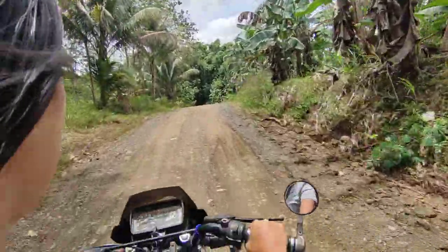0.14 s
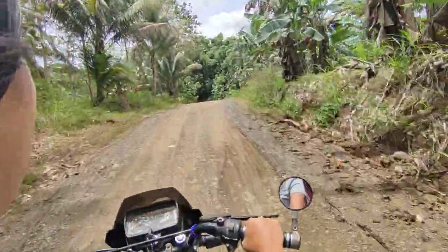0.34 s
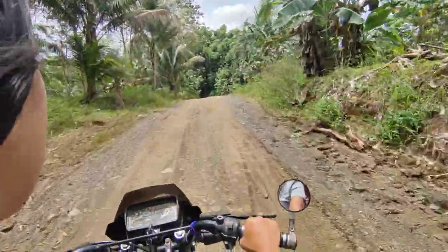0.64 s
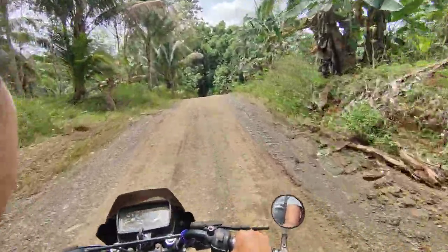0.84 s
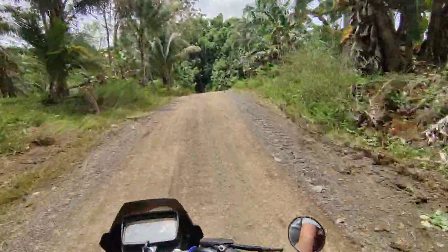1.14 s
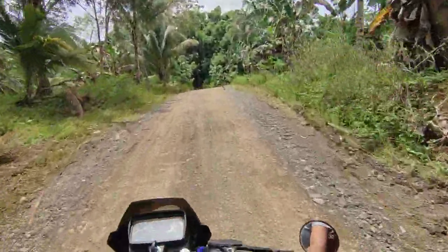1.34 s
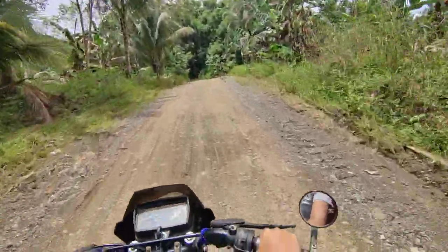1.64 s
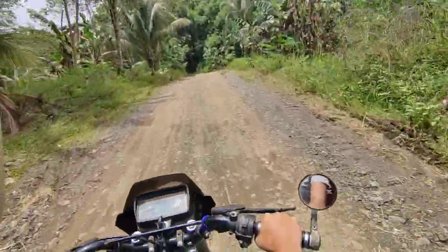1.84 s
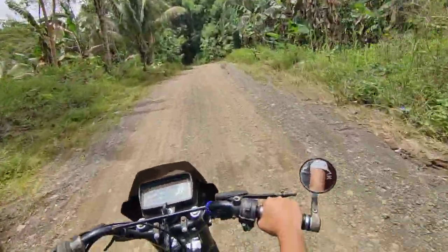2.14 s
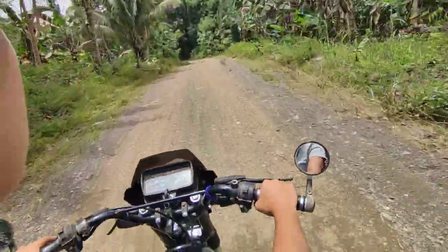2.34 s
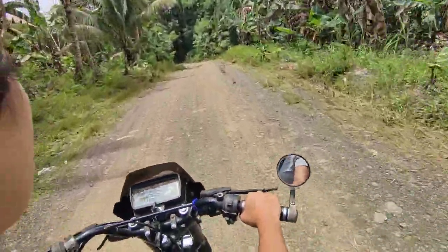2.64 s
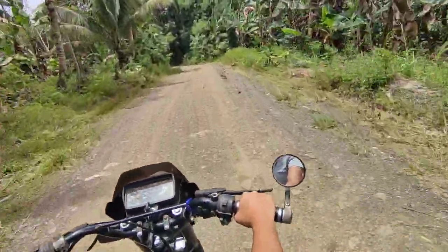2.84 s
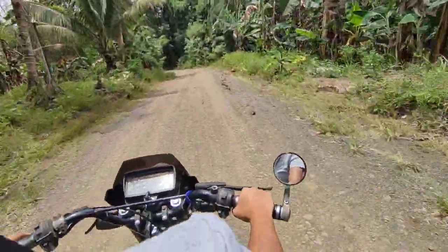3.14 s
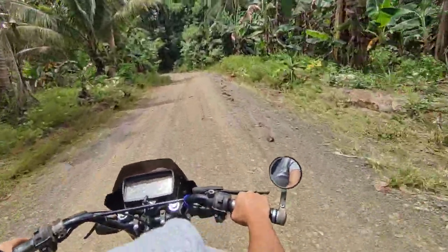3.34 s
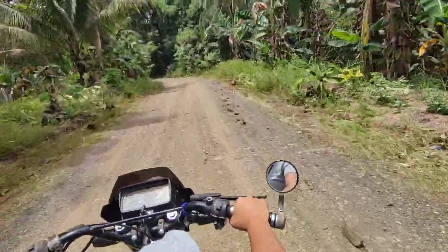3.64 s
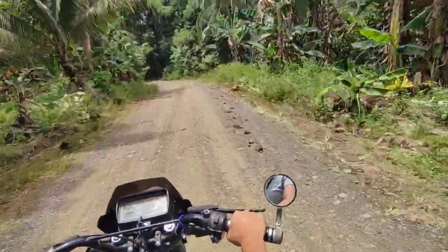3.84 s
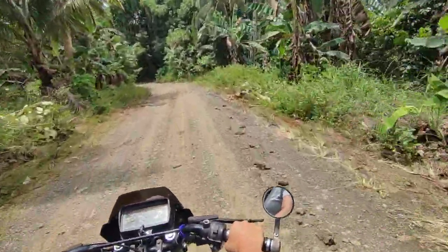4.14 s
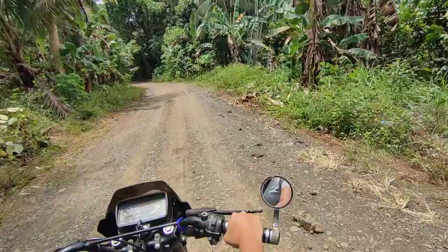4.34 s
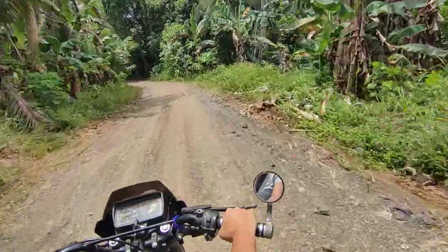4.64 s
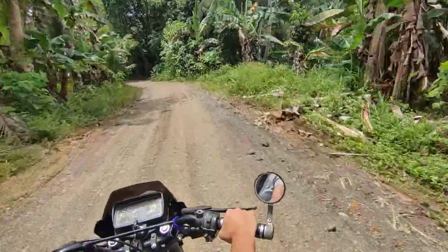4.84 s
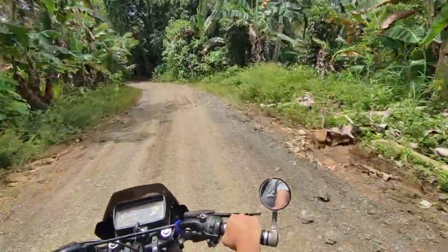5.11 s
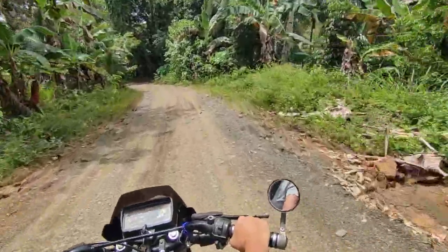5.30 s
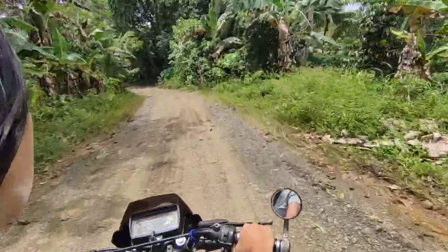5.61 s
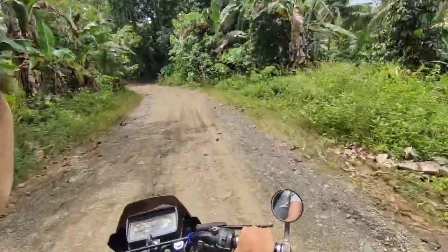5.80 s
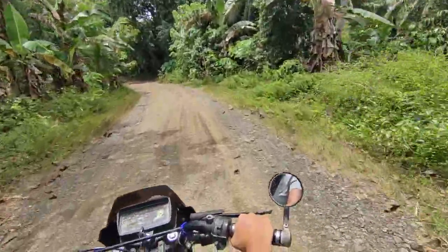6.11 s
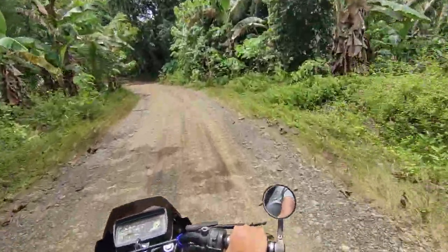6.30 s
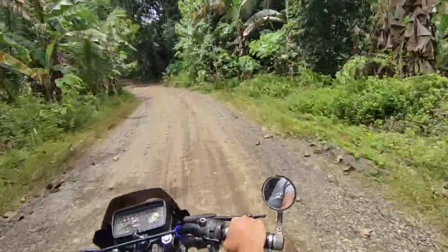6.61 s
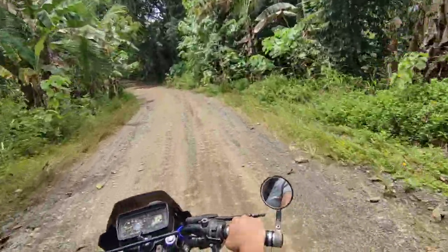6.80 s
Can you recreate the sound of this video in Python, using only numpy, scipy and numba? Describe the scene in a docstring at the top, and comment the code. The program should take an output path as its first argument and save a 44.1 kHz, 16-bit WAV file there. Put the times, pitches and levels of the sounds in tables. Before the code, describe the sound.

Heard from just behind the handlebar, a small single-cylinder motorcycle is already riding on gravel. Its exhaust thuds rapidly over metallic rattle, gear whine and tyre hiss. Wind buffets the right side hard after one second, then snaps at the left. The engine runs lighter through the middle, two tiny stones tick around four seconds, and it finally pulls harder amid new gusts.

```python
"""A small single-cylinder motorcycle rides along a gravel road, heard at two ports behind the handlebar.
From the start each firing rings silencer, air box and cases, gears whine and gravel hisses; the engine
pulls, then runs light from 0.2 s. Wind rumbles on each port by itself; pressure lumps and eddy rasp buffet
the right port most at 1.1-2.1 s, the left at 2.3-2.6 s. Two stones tick near 4 s as decaying noise; from
5.7 s the engine pulls hard again amid gusts. Each port's limiter ducks everything on that side."""
import sys
import numpy as np
from scipy import signal
from scipy.fft import rfft, irfft
from scipy.io import wavfile
from scipy.ndimage import uniform_filter1d
from numba import njit

SR = 44100
rng = np.random.default_rng(int(sys.argv[2]) if len(sys.argv) > 2 else 0)


def generate_wav(sig):
    """Save sig (samples, or channels by samples) to the path in sys.argv[1] as 16-bit PCM at SR."""
    pcm = np.round(np.clip(np.atleast_2d(sig).T, -1, 1) * 32767).astype(np.int16)
    wavfile.write(sys.argv[1], SR, pcm)


N = 306930


def undb(db):
    """Decibels to amplitude."""
    return 10 ** (np.asarray(db) / 20)


def unit(x):
    """Scale to an RMS of 1."""
    return x / np.sqrt(np.mean(x ** 2))


def curves(table):
    """Columns of a table joined by straight lines in time."""
    s, *columns = np.transpose(table)
    return [np.interp(np.arange(N) / SR, s, c) for c in columns]


@njit
def svf(x, hz, width_hz):
    """State-variable filter with a moving centre: band-pass and low-pass."""
    band_out, low_out = np.empty(len(x)), np.empty(len(x))
    b, l = 0., 0.  # the two integrator states
    for i in range(len(x)):
        g, k = np.pi * hz[i] / SR, width_hz / hz[i]
        v = (b + g * (x[i] - l)) / (1 + g * (g + k))
        band_out[i], low_out[i] = k * v, l + g * v
        b, l = 2 * v - b, l + 2 * g * v
    return band_out, low_out


def warp(hz):
    """The setting at which the filter really rings at hz."""
    return np.tan(np.pi * hz / SR) * SR / np.pi + np.zeros(N)


def band(x, hz, width_hz):
    """Band-pass resonance with its pitch and width corrected for the sample rate."""
    return svf(x, warp(hz), width_hz / np.cos(np.pi * np.mean(hz) / SR) ** 2)[0]


def steep(x, hz, width_hz):
    """Two band-passes in a row, the second narrower, for steeper skirts."""
    return band(band(x, hz, width_hz), hz, 0.59 * width_hz)


def low(x, hz):
    """Second-order low-pass."""
    return svf(x, hz + np.zeros(N), np.sqrt(2) * hz)[1]


@njit
def follow(x, release):
    """Peak follower: jumps up at once, sinks slowly."""
    out, e = np.empty(len(x)), 0.
    for i in range(len(x)):
        e = max(x[i], e * release)
        out[i] = e
    return out


def noise():
    """White noise as long as the scene."""
    return rng.standard_normal(N)


def walk(rate):
    """Random levels held 1 / rate s and slewed twice; scaled to an RMS of 1."""
    k = int(SR / rate)
    steps = np.repeat(rng.standard_normal(N // k + 1), k)
    return unit(uniform_filter1d(uniform_filter1d(steps, k), k)[:N])


def sides(pan_db):
    """Left and right gains that differ by pan_db."""
    return undb(np.array([[pan_db], [-pan_db]]) / 2)


def firing(hz, first_turn=.69, jitter=0.0068, scatter_db=1.85):
    """One pulse per cycle, each a little early or late and of its own strength; also phase and cycle number."""
    turns = first_turn + np.cumsum(hz) / SR + jitter * walk(25)
    cycle = np.maximum.accumulate(np.floor(turns)).astype(int)
    strength = undb(scatter_db * rng.standard_normal(cycle[-1] + 1))[cycle]
    return np.diff(cycle, prepend=cycle[0]) * strength, turns % 1, cycle


def boom(pulses, hz, boom_db, load):
    """The silencer passes the low firing orders as a clean boom; under load it sinks to the lower ones."""
    # third to sixth order with a light and a pulling engine: (level [dB])
    light_orders = [-39, -31.5, -22.5, -29]
    pulling_orders = [-15, -9.5, -17.5, -36.5]
    out, ring = 0, band(pulses, hz=152.5, width_hz=32)
    for order, (light_db, pulling_db) in enumerate(zip(light_orders, pulling_orders), start=3):
        line = steep(ring, order * hz, width_hz=24.7)
        steady_line = line / np.sqrt(uniform_filter1d(line ** 2, size=8000) + 1e-12)
        out = out + undb(boom_db + light_db + load * (pulling_db - light_db)) * steady_line
    return out


def honk(pulses, bite_db):
    """The air box gulps after each firing and once more as the wave returns, ringing its resonances."""
    # air-box resonances: (centre [Hz], width before steepening [Hz], relative level [dB])
    airbox = [(289.5, 180, 8.5), (312.7, 27, -0.5)]
    lag_s, echo_s, echo_db = .0065, .0115, -1
    gulp = np.roll(pulses, int(lag_s * SR))
    gulp = gulp + undb(echo_db) * np.roll(gulp, int(echo_s * SR))
    ring = -sum(undb(db) * unit(steep(gulp, f, w)) for f, w, db in airbox)
    return undb(-37 + bite_db) * unit(ring)


def bark(pulses, phase, load, bite_db):
    """Pulses ring the pipe resonances and turbulent gas roughens them; throttle bite brings them out."""
    # pipe resonances: (centre [Hz], width before steepening [Hz], relative level [dB],
    # left minus right [dB], added at full load [dB])
    pipe = [(64, 60, 3, 0, 16.5), (215.4, 2.9, 6.5, -9, -16.5), (378.7, 12.6, -2.5, -1, -0.5),
            (489.4, 87, -10, 5, 9), (760, 100, -10.5, 10.5, 2)]
    gas = unit(pulses) + .22 * unit(np.exp(-phase / .3) * noise())
    out = 0
    for k, (f, w, db, pan_db, load_db) in enumerate(pipe):
        polarity = (-1) ** k
        out = out + polarity * undb(db + load * load_db) * sides(pan_db) * unit(steep(gas, f, w))
    bite_share, full_load_db = .59, -3  # dB per dB of bite; dB added at full load
    return undb(-41.5 + bite_share * bite_db + full_load_db * load) * out


def pop(pulses, load):
    """A short pop at the pipe mouth just ahead of each pulse, stronger under load."""
    lead_s = .003
    early_pulses = np.roll(pulses, -int(lead_s * SR))
    return undb(-54 + 23 * load) * unit(steep(early_pulses, hz=400, width_hz=340))


def chatter(pulses, phase):
    """Rasp of the exhaust valve: each pulse and its fading puff of noise ring one wide band."""
    # valve rasp: (time [s], level before wavering [dB])
    valve_level = [(0, -50), (1.2, -56), (3.2, -55), (3.6, -50), (4.2, -55), (5.5, -54), (5.65, -45),
                   (5.9, -43), (6.1, -43.5), (6.22, -50), (6.42, -43), (6.55, -45), (6.96, -47)]
    puff = unit(pulses) + unit(np.exp(-phase / .2) * noise())
    wavering_db = curves(valve_level)[0] + 1.4 * walk(12)
    return undb(wavering_db) * unit(steep(puff, hz=1690, width_hz=400))


def rattle(phase, cycle, load, scatter_db=1.3, shared=.6, knock=.18):
    """Each firing knocks and shakes the cases, a weaker shake follows in the cycle; every ring varies by itself."""
    # ringing of the engine cases: (centre [Hz], width [Hz], relative level [dB],
    # left minus right [dB], added at full load [dB])
    case_rings = [(1190, 190, -13, -7, 10.5), (1773, 100, -5, -2.5, 1.5), (2350, 240, -10.5, -7, -5),
                  (3670, 450, -7.5, -8, -1), (4780, 900, -14, -14, -1), (7084, 170, -10, -9.5, 0.5),
                  (6100, 630, -23.5, -14, 7), (11000, 4500, -36, 3, 0)]
    # case rattle as a whole: (time [s], level [dB])
    rattle_level = [(0, -35.5), (.15, -35), (.35, -39), (.55, -34), (.75, -38.5), (1, -41), (2, -47.5),
                    (3, -47.5), (4.5, -46), (5.55, -49.5), (5.7, -42), (6.4, -43), (6.96, -40.5)]
    early = (phase + .06) % 1  # the knock leads the firing by this share of a turn
    late_shake = .4 * np.exp(-((phase + .62) % 1) / .1)
    burst = np.exp(-(early / .22) ** 2) + .06 + late_shake
    click = unit(1. * (np.diff(early, prepend=0) < -.5))
    shake_db = 1.6 * walk(4.4)  # the road shakes the cases by fits
    blow, out = rng.standard_normal(cycle[-1] + 1), 0
    for f, w, db, pan_db, load_db in case_rings:
        own = rng.standard_normal(len(blow))
        strength = undb(scatter_db * (0.95 * blow + own))[cycle]
        common = noise()
        ring = []
        for _ in range(2):
            rough = unit(burst * (shared * common + noise()))
            ring.append(band(strength * (knock * click + rough), f, w))
        out = out + undb(db + load * load_db + shake_db) * sides(pan_db) * unit(np.array(ring))
    return undb(curves(rattle_level)[0]) * out


def colour(x, column):
    """The tyre spectrum of one port, falling away below the lowest listed frequency."""
    # tyre noise as each port colours it: (frequency [Hz], left level per Hz [dB], right level per Hz [dB])
    port_spectra = [(276, 8, 5.5), (860, 0.5, 4), (1450, -5.5, -1), (2170, -3, -2.5), (2200, -2, -1.5),
                    (3100, -7, -5), (4020, -12.5, -5), (4860, -16.5, -12), (7200, -18.5, -7),
                    (7770, -26, -10.5), (7900, -14.5, -37), (8860, -17.5, -48), (9230, -25, -15.5),
                    (10450, -26.5, -20), (14000, -23.5, -22)]
    ports = np.array(port_spectra, float)
    hz = np.maximum(np.arange(N // 2 + 1) * SR / N, 1)
    level_db = np.interp(np.log(hz), np.log(ports[:, 0]), ports[:, column])
    gain = undb(level_db) * np.minimum(hz / ports[0, 0], 1) ** 2
    return irfft(rfft(x) * gain, N)


def tyres(shared=0.65):
    """Gravel under the tyres: dense flickering grit, partly common to both ports."""
    # tyre hiss: (time [s], level [dB])
    gravel_level = [(0, -37.5), (1.2, -38), (2.4, -39.5), (3.2, -40), (4.8, -41), (5.8, -39.5),
                    (6.96, -40.5)]
    crunch = rng.exponential(size=N // 64 + 1).repeat(64)[:N]
    grit = undb(.7 * walk(14) + .6 * crunch)
    common = noise()
    hiss = np.array([colour(grit * (shared * common + noise()), column=c) for c in (1, 2)])
    flicker = undb(2.2 * walk(11)) - 1
    hiss += flicker * np.array([band(h, 11500, 5000) for h in hiss])  # the top flickers
    return undb(curves(gravel_level)[0]) * hiss / np.std(band(hiss[1], 4640, 3570))


def gears(hz, phase, load):
    """The gear mesh and its housing ring roughly and throb as each firing loads the teeth."""
    # gear mesh: (multiple of the firing rate, width before steepening [Hz], relative level [dB])
    mesh_orders = [(42.2, 150, 0)]
    # gearbox housing: (centre before wavering [Hz], width [Hz], relative level before wavering [dB],
    # left minus right [dB], added at full load [dB])
    housing_rings = [(1360, 130, -4.5, -4, -1.5), (2665, 45, -9, -17.5, -10.5), (4000, 80, -7.5, -10, -14),
                     (2810, 67, -12, -8, -13), (4720, 66, -14, -10, -11), (2400, 65, -24, 21, -1)]
    lagged = (phase - .2) % 1  # turns
    throb = unit(.35 + np.exp(-lagged / .2))
    teeth = throb * noise() + .6 * unit(1. * (np.diff(lagged, prepend=0) < -.5))
    out = sides(-3) * sum(undb(db) * unit(steep(teeth, k * hz, w)) for k, w, db in mesh_orders)
    waver = 1 + .007 * walk(9)  # one pitch waver for the whole housing
    for f, w, db, pan_db, load_db in housing_rings:
        fit_db = 2.2 * walk(6)
        ring = unit(band(throb * noise(), f * waver, w))
        out = out + undb(db + load * load_db + fit_db) * sides(pan_db) * ring
    return undb(-46.5 + 7 * load) * out


def hums(pulses, hz):
    """A few high orders of the firing stand out as wavering lines."""
    # humming orders: (multiple of the firing rate, full from [s], full until [s],
    # level before wavering [dB], left minus right [dB])
    hum_orders = [(26, 0, 2.1, -49, 18), (19, 0.16, 1.26, -41, 3), (15, 0.12, 0.49, -45, 1),
                  (16, 1.71, 2.53, -39, 4), (40, 0.13, 0.42, -57, 0), (24, 0, 0.61, -44, 7)]
    t, out, fade_s = np.arange(N) / SR, 0, .2
    for order, start, end, db, pan_db in hum_orders:
        fade = np.clip(np.minimum(t - start, end - t) / fade_s + 1, 0, 1)
        line = unit(steep(pulses, round(order) * hz, width_hz=55))
        out = out + undb(db + 1.1 * walk(12.8)) * sides(pan_db) * fade * line
    return out


def rumble(gust):
    """Low turbulence unrelated between the ports, lumpy and swollen by gusts."""
    # rumble between gusts, left and right: (level [dB])
    calm_level = [-30, -24]
    out = []
    for db, swell in zip(calm_level, gust):
        lumps = undb(3.6 * walk(8.3))
        deep = unit(low(band(noise(), 20.2, 33.0), 250))
        upper = undb(-9.5) * unit(low(low(noise(), 180), 290))
        out.append(np.hypot(undb(db), swell) * lumps * (deep + upper))
    return np.array(out)


def eddy_rasp():
    """Small eddies at each port: fluttering noise with its top and bottom rolled off."""
    # upper edge of the rasp, left and right: (frequency [Hz])
    rasp_edges = [845, 548]
    out = []
    for top_hz in rasp_edges:
        flutter = noise() * undb(3.3 * walk(200))
        eddy = low(low(low(flutter, top_hz), top_hz), 1.09 * top_hz)
        out.append(eddy - low(eddy, 127))
    return out


def buffets(eddies):
    """Hard buffets on one port: a pressure lump that pushes and rebounds, with a rasp of eddies."""
    # buffets: (time [s], port 0 left 1 right, thump level [dB], rasp level [dB], length [s])
    blows = [(0.239, 1, -18, -27, 0.018), (0.662, 0, -37, -24.5, 0.099), (0.706, 0, -34, -20, 0.0089),
             (0.841, 0, -12, -29, 0.03), (1.169, 1, -15, -31, 0.01), (1.191, 1, -23, -20, 0.032),
             (1.244, 1, -7.5, -24, 0.013), (1.317, 1, -14, -24, 0.031), (1.352, 1, -15, -36, 0.027),
             (1.376, 1, -9, -36, 0.025), (1.392, 1, -9.5, -34, 0.025), (1.417, 1, -6.5, -17, 0.021),
             (1.44, 1, -12, -29, 0.035), (1.459, 1, -11, -25, 0.034), (1.503, 0, -12, -28, 0.0093),
             (1.505, 1, -2, -22, 0.032), (1.611, 1, -29, -17.5, 0.028), (1.605, 1, -12, -39, 0.026),
             (1.628, 1, -15, -28, 0.055), (1.656, 1, -16, -16, 0.013), (1.674, 1, -7, -34, 0.033),
             (1.748, 1, -2, -25, 0.019), (1.845, 1, -25, -25, 0.033), (1.875, 1, -25, -18, 0.025),
             (1.91, 1, -8.5, -26, 0.038), (2.114, 0, -31, -23, 0.019), (2.126, 0, -29, -28, 0.009),
             (2.02, 1, -19, -35, 0.048), (2.198, 0, -23, -25, 0.016), (2.299, 0, -26, -23, 0.015),
             (2.333, 0, -12, -15, 0.0061), (2.351, 0, -15, -13, 0.0093), (2.365, 0, -3.5, -5, 0.0073),
             (2.372, 0, -27, -12, 0.011), (2.384, 0, -13, -13, 0.015), (2.469, 0, -4.5, -9, 0.012),
             (2.486, 0, -23, -7, 0.022), (2.5, 0, -10, -16, 0.011), (2.511, 0, -18, -9, 0.019),
             (2.605, 0, -25, -24, 0.012), (2.622, 0, -18, -19, 0.01), (2.63, 0, -15, -18, 0.007),
             (3.479, 0, -35, -17, 0.0057), (3.483, 0, -13, -13, 0.0096), (3.981, 1, -20, -38, 0.028),
             (4.186, 0, -30, -25, 0.01), (4.921, 0, -21, -43, 0.021), (5.803, 1, -21, -21, 0.028),
             (5.87, 1, -11.5, -37, 0.031), (5.96, 1, -21, -39, 0.025)]
    out, t = np.zeros((2, N)), np.arange(N) / SR
    swirls = [low(low(band(noise(), 19, 57), 110), 120) for _ in range(2)]
    for s, port, thump_db, rasp_db, length in blows:
        side = round(port)
        near = slice(max(int((s - length) * SR), 0), int((s + length) * SR))
        u = (t[near] - s) / (length / 2)
        shove = np.exp(-(5.4 * u) ** 2) - 0.4 * np.exp(-(1.3 * (u - .8)) ** 2)  # push, then a slower rebound
        lump = unit(unit(shove) + 0.2 * unit(np.exp(-u ** 2) * swirls[side][near]))
        rasp = unit(np.exp(-u ** 6) * eddies[side][near])
        out[side, near] += undb(thump_db) * lump + undb(rasp_db) * rasp
    return out


def gusts():
    """Strength of the gusts on each port: quick rise, hold, slower fall."""
    # gusts: (start [s], rise and hold [s], port 0 left 1 right, rumble level before lumps [dB])
    gust_times = [(0.51, 0.33, 0, -21), (1.45, 0.16, 0, -26), (1.135, 0.39, 1, -13.5),
                  (1.587, 0.081, 1, -28), (1.8, 0.24, 1, -18.5), (2.05, 0.26, 0, -20.5),
                  (2.504, 0.25, 1, -23.5), (3.89, 0.38, 1, -26.5), (5.628, 0.27, 0, -17),
                  (5.618, 0.19, 1, -16.5), (6.092, 0.11, 1, -20)]
    out, t = np.zeros((2, N)), np.arange(N) / SR
    rise_s, fall_s = 0.012, 0.37
    for s, length, port, db in gust_times:
        out[round(port)] += undb(db) * np.interp(t - s, [0, rise_s, length, length + fall_s], [0, 1, 1, 0])
    return out


def gust_rasp(gust, eddies):
    """Gusts rasp by fits as their eddies flare and fade."""
    return gust * np.array([undb(-30 + 8 * walk(23)) * unit(e) for e in eddies])


def wind():
    """Rumble, buffets and raspy gusts, made separately for each port."""
    gust, eddies = gusts(), eddy_rasp()
    return rumble(gust) + buffets(eddies) + gust_rasp(gust, eddies)


def stones():
    """Flung stones tick on the frame, each a short bright rattle of decaying noise."""
    # stones: (time [s], relative level at the onset [dB], left minus right [dB])
    stone_hits = [(3.948, -32, -7), (3.978, -40, -4)]
    out, t, decay_s = np.zeros((2, N)), np.arange(2000) / SR, .0077
    hiss = unit(band(noise(), 6800, 2800))
    hiss = hiss + 0.58 * unit(band(noise(), 3900, 2000))
    hiss = hiss + 0.4 * unit(band(noise(), 13000, 4000))
    for s, db, pan_db in stone_hits:
        i = int(s * SR)
        out[:, i:i + len(t)] += undb(db) * sides(pan_db) * np.exp(-t / decay_s) * hiss[i:i + len(t)]
    return out


def scene():
    """The bike reaches the left port a little later; wind and stones are added without that lag."""
    # engine speed: (time [s], firing rate before jitter [Hz])
    engine_speed = [(0.0, 28.46), (0.35, 29.22), (0.6, 30.22), (0.95, 31.53), (1.25, 31.02), (1.5, 31.44),
                    (1.8, 32.23), (2.05, 31.92), (2.4, 31.5), (2.8, 31.63), (3.3, 31.64), (3.85, 31.38),
                    (4.08, 31.07), (4.35, 32.41), (4.7, 31.34), (5.0, 30.89), (5.15, 31.87), (5.6, 31.53),
                    (6.0, 31.31), (6.35, 29.93), (6.6, 30.88), (6.72, 29.44), (6.96, 30.04)]
    # how the engine is driven: (time [s], relative boom level [dB], load 0 light - 1 pulling,
    # throttle bite [dB])
    engine_drive = [(0, -0.5, 0.66, 17), (.17, 3.5, 0.066, 16.5), (.27, 4.5, 0.042, 4),
                    (.47, 4.5, 0.083, 7), (.54, 1, 0.09, 15), (.75, 1, 0.32, 13.5), (.95, 1.5, 0.26, 6.5),
                    (1.3, 2.5, 0.36, 5), (2.0, 0.5, 0.23, 3.5), (2.7, -0.5, 0.23, 1.5),
                    (4.4, -1.5, 0.34, -3.5), (4.8, -3, 0.48, -0.5), (5.58, -4, 0.48, -3),
                    (5.68, 0, 0.79, 0), (5.8, -2, 0.81, -2), (6.3, -1.5, 0.75, 4), (6.55, -1.5, 0.78, -3),
                    (6.72, -0.5, 0.71, 3), (6.96, -0.5, 0.64, -12)]
    hz, = curves(engine_speed)
    boom_db, load, bite_db = curves(engine_drive)
    pulses, phase, cycle = firing(hz)
    exhaust = boom(pulses, hz, boom_db, load) + pop(pulses, load) + chatter(pulses, phase)
    exhaust = exhaust + bark(pulses, phase, load, bite_db)
    engine = exhaust + honk(pulses, bite_db) + rattle(phase, cycle, load)
    bike = engine + tyres() + gears(hz, phase, load) + hums(pulses, hz)
    bike[0] = np.roll(bike[0], 8)  # left lag in samples
    return bike + wind() + stones()


def record(dry):
    """Each port has its own limiter, so gusts duck the engine on that side; then the top is cut."""
    limit_db, ratio, release_s = -7, 1.9, .1
    release = np.exp(-1 / (release_s * SR))
    peak = np.array([uniform_filter1d(follow(np.abs(x), release), size=400) for x in dry])
    gain = np.minimum(undb(limit_db) / peak, 1) ** (1 - 1 / ratio)
    clipped = np.clip(1.2 * np.tanh(dry * gain / 1.2), -.98, .98)  # soft, then hard
    top_cut = signal.ellip(12, .3, 95, 14200, fs=SR, output="sos")  # ripple dB, stop dB, edge Hz
    return signal.sosfilt(top_cut, clipped)


dry = scene()
out = record(dry)
generate_wav(out)
```